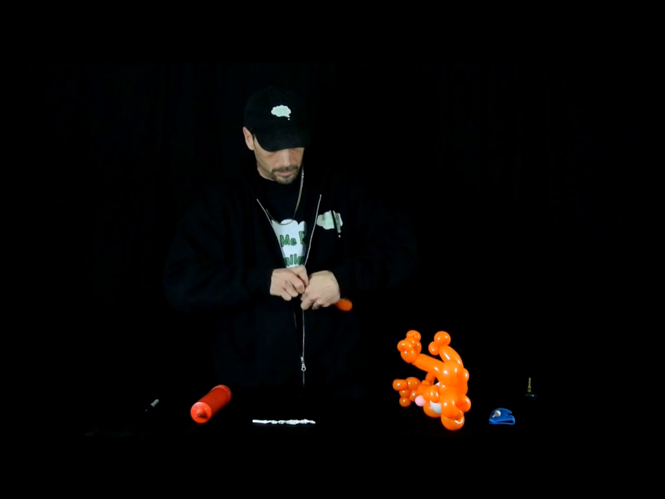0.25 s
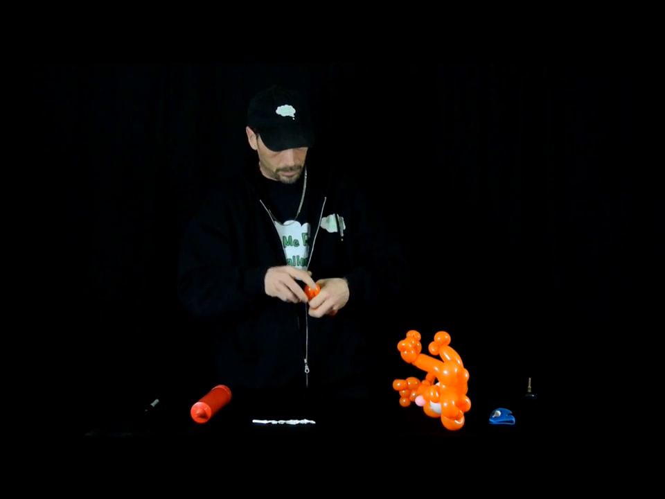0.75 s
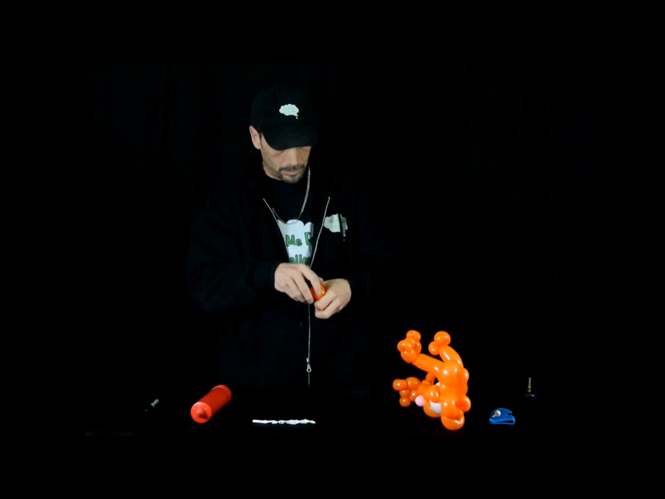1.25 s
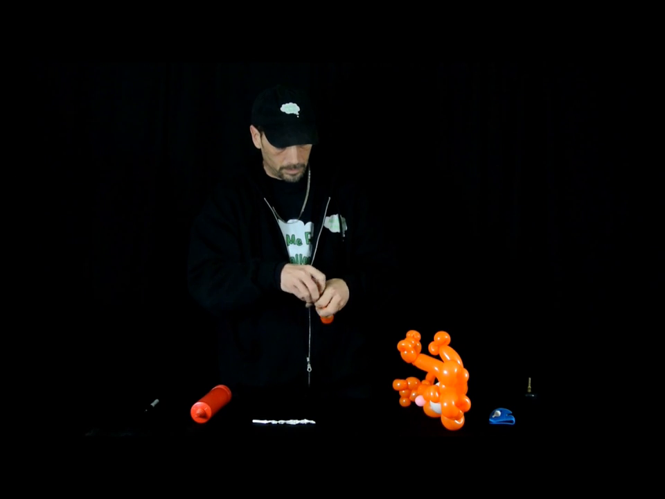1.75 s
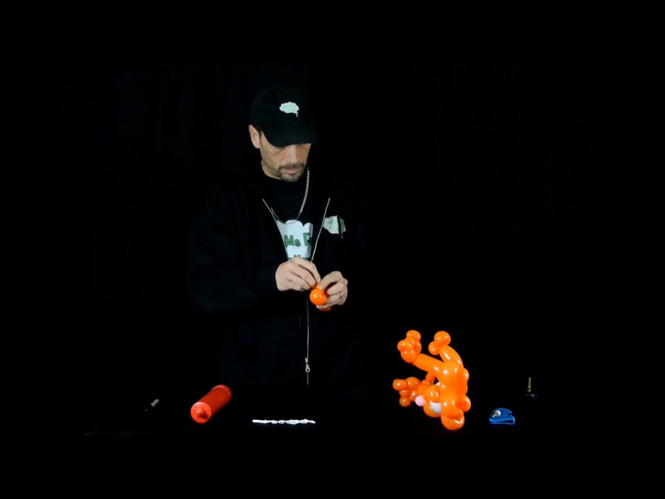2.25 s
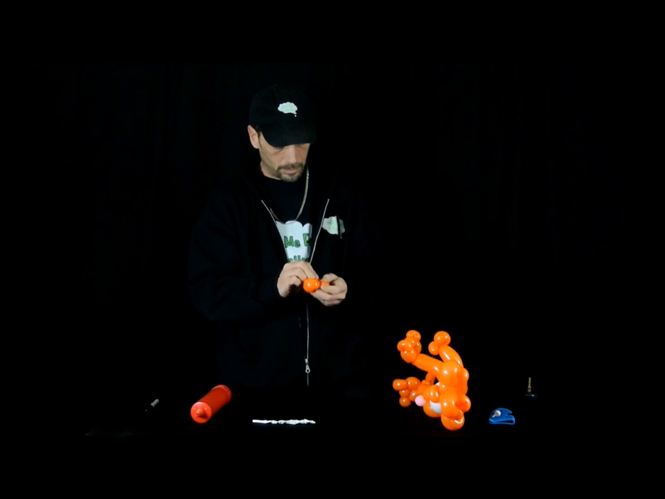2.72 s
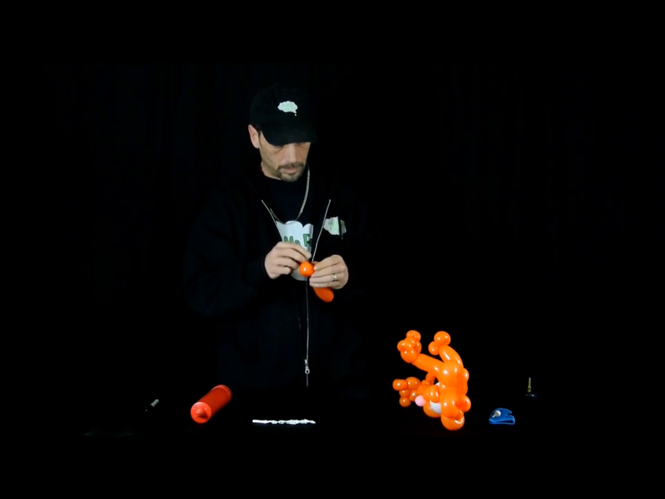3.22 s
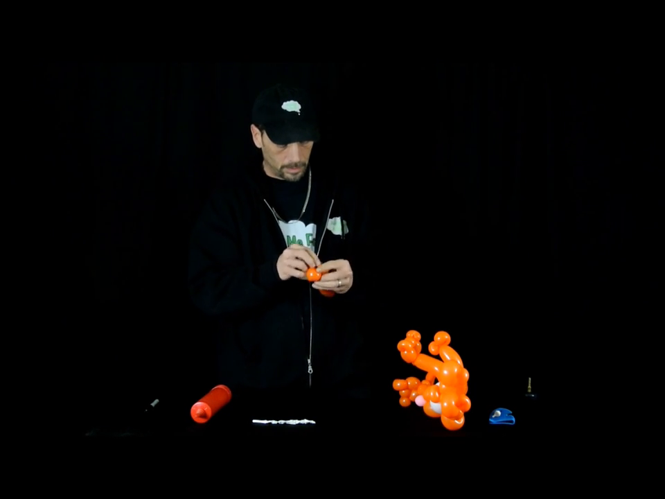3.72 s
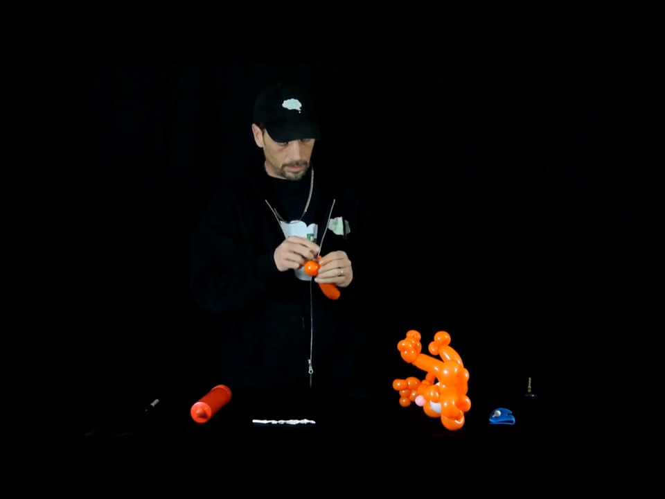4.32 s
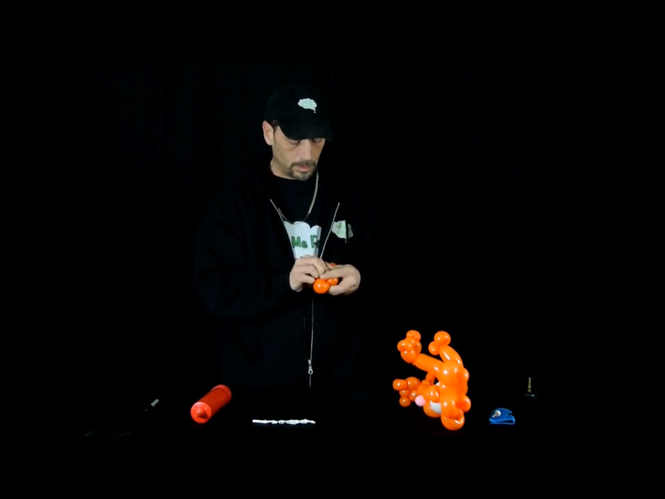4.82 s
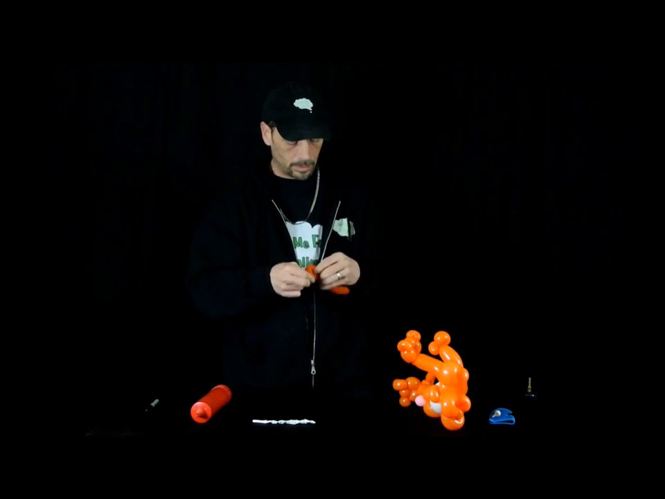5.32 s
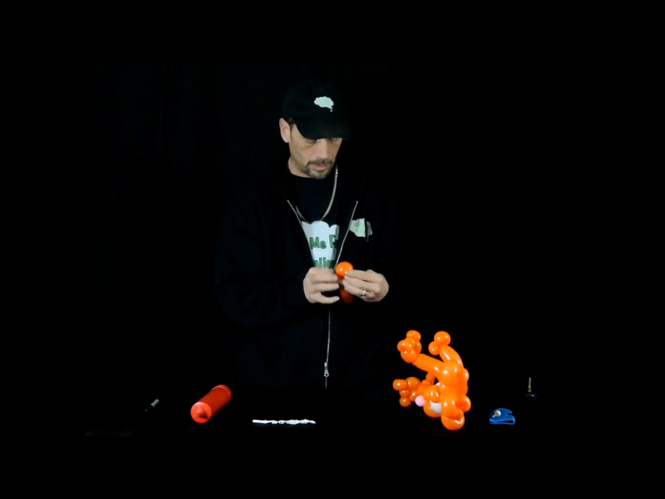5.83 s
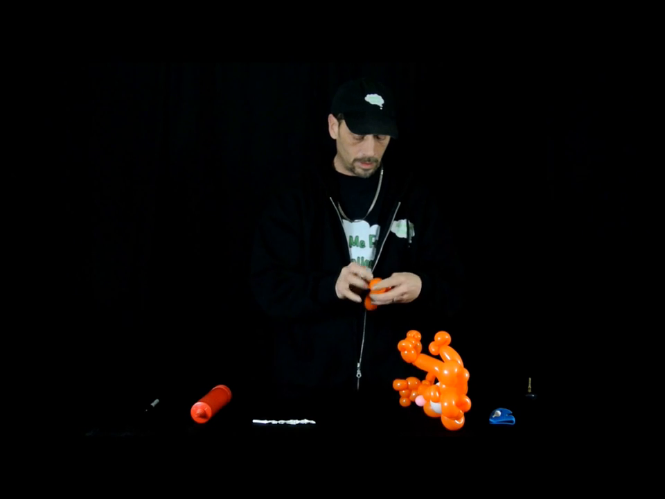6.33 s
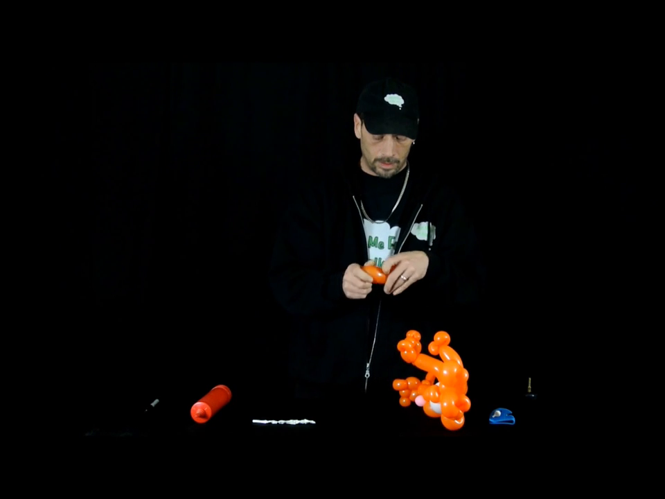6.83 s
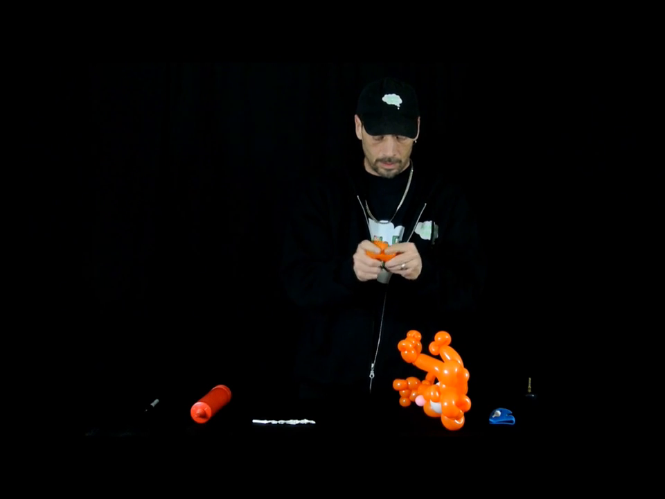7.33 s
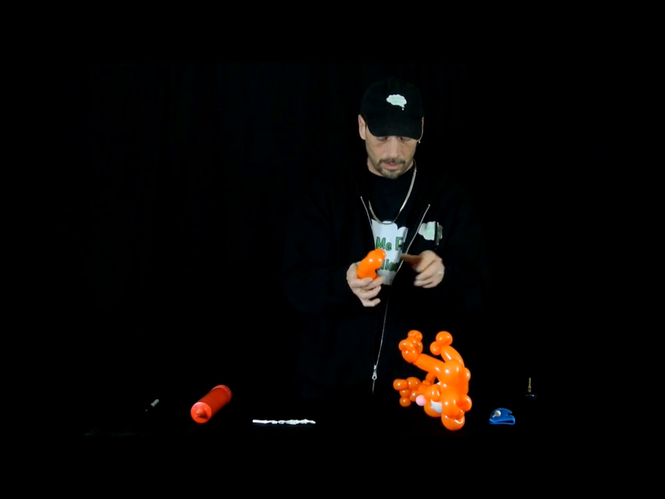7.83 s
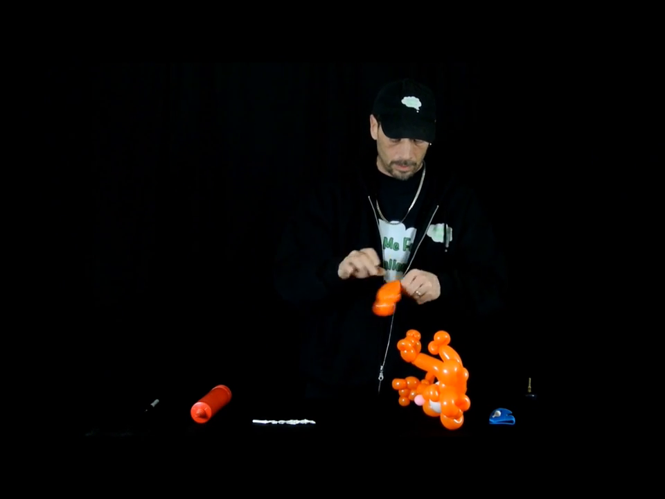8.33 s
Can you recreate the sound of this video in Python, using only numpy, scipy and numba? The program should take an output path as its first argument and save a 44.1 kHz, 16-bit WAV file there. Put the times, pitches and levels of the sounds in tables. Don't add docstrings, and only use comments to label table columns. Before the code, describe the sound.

Fingers rub and twist stretched rubber, squeaking and crackling in irregular bursts that grow denser and louder, with a short indoor echo.

```python
import sys
import numpy as np
from scipy import signal
from scipy.fft import rfft, irfft
from scipy.io import wavfile
from scipy.ndimage import uniform_filter1d
from numba import njit

SR = 44100
rng = np.random.default_rng(int(sys.argv[2]) if len(sys.argv) > 2 else 0)


def dump(signal):
    limited = np.clip(np.atleast_2d(signal).T, -1, 1)
    pcm = np.round(limited * 32767).astype(np.int16)
    wavfile.write(sys.argv[1], SR, pcm)


def gain_from_db(level_db):
    decades = np.asarray(level_db, float) / 20
    return 10 ** decades


N = 377496


def unit(x):
    return x / np.sqrt(np.mean(x ** 2))


def colour(x, points):
    hz, db = np.transpose(points)
    log_hz = np.log(np.fft.rfftfreq(x.shape[-1], 1 / SR) + 1)
    gain = gain_from_db(np.interp(log_hz, np.log(hz), db))
    return irfft(rfft(x) * gain, x.shape[-1])


@njit
def svf(x, hz, width):
    y, b, l = np.empty(len(x)), 0., 0.
    for i in range(len(x)):
        g, k = np.tan(np.pi * hz[i] / SR), width[i] / hz[i]
        v = (b + g * (x[i] - l)) / (1 + g * (g + k))
        b, l, y[i] = 2 * v - b, l + 2 * g * v, k * v
    return y


def walk(rate):
    hold = int(SR / rate)
    held = np.repeat(rng.standard_normal(N // hold + 1), hold)
    return 0.87 * uniform_filter1d(held, hold)[:N]


def progress(length):
    return np.arange(int(length * SR)) / (length * SR)


def add(out, start, x):
    i = int(start * SR)
    out[i:i + len(x)] += x[:N - i]


# (frequency [Hz], level [dB])
HUM_TONES = [(59.2, -64.5), (117.5, -71.5), (174, -78)]
# (frequency [Hz], level per Hz [dB])
HISS_TONE = [(25, -7.5), (60, -2), (150, -5.5), (400, -3), (900, -9), (2000, -15), (5000, -21.5),
             (11000, -30.5), (16000, -30.5)]


def camera():
    t = np.arange(N) / SR
    hum = 0
    for hz, db in HUM_TONES:
        level = gain_from_db(db + 4 + 0.35 * walk(4.6))
        hum = hum + level * np.sin(2 * np.pi * hz * t + 0.33 * walk(3.7))
    mid, side = colour(rng.standard_normal((2, N)), HISS_TONE)
    side = colour(side, [(60, -4), (600, -4.0), (3000, 12), (15000, 15.5)])
    return hum + gain_from_db(-51) * unit(np.array([mid + side, mid - side]))


# (frequency [Hz], time to fade by 60 dB [s], level [dB])
WALL_ECHOES = [(200, 0.33, -14), (500, 0.33, -5.5), (1506, 0.22, -3.5), (3000, 0.2, -2), (7000, 0.16, -5.5),
               (14400, 0.046, -6.5)]


def room(x):
    t = np.arange(SR // 2) / SR
    tails = 0
    for hz, t60, db in WALL_ECHOES:
        band = signal.butter(2, [hz / 1.6, min(hz * 1.6, 20000)], "band", fs=SR, output="sos")
        fade = np.exp(-np.log(1000) * t / t60)
        decay = fade * np.clip((t - 0.004) / 0.003, 0, 1)
        noise = rng.standard_normal((4, 2, len(t)))
        tails = tails + gain_from_db(db) * signal.sosfilt(band, noise) * decay / np.sqrt(np.sum(decay ** 2))
    places = np.array([walk(14) for _ in tails])
    places /= np.sqrt(np.sum(places ** 2, axis=0))
    echoes = signal.fftconvolve((x * places)[:, None], tails, axes=2)
    return x + echoes.sum(axis=0)[:, :N]


# (time [s], length [s], start pitch [Hz], end pitch [Hz], level [dB])
END_FLAPS = [
    (2.906, 0.12, 325, 160, -46),
    (4.024, 0.11, 230, 156, -44),
    (6.203, 0.089, 500, 265, -47),
    (7.768, 0.08, 468, 200, -42.5),
]


def flaps():
    out = np.zeros(N)
    for start, length, hz0, hz1, db in END_FLAPS:
        u = progress(length)
        hz = hz1 + (hz0 - hz1) * (1 - u) ** 2
        wobble = svf(rng.standard_normal(8192)[:len(u)], hz, 0.73 * hz)
        wobble = svf(wobble, hz, 0.73 * hz)
        add(out, start, gain_from_db(db) * unit(wobble) * np.sin(np.pi * u ** 0.69))
    return out


# (time [s], length [s], slip rate [Hz], level [dB], lowest partial [dB])
STEADY_GRIPS = [(0.352, 0.16, 1253, -60, 5), (0.564, 0.048, 1242, -27.5, -7.5),
                (1.406, 0.048, 798, -47.5, 3), (2.899, 0.011, 586, -23, -2.5), (4.78, 0.022, 723, -42, 0.5),
                (5.234, 0.013, 424, -52.5, 11.5), (5.922, 0.032, 634, -26.5, -12),
                (6.019, 0.018, 1410, -27, -5), (6.181, 0.035, 1225, -39.5, 5),
                (6.58, 0.064, 438.4, -26, -23.5), (7.342, 0.035, 1285, -50.5, 9)]
# (time [s], length [s], start slip rate [Hz], end slip rate [Hz], level [dB])
SLIDING_GRIPS = [
    (1.824, 0.031, 713, 674, -48),
    (3.758, 0.006, 1400, 1270, -39),
    (3.989, 0.012, 1190, 2510, -30),
    (5.583, 0.061, 383, 400, -53),
    (5.875, 0.067, 362, 442, -53.5),
    (6.069, 0.045, 390, 302, -47.5),
    (6.225, 0.089, 729, 810, -50.5),
    (6.707, .13, 1000, 1254, -47.5),
    (7.603, 0.12, 1390, 1040, -41),
    (7.755, 0.032, 700, 500, -35),
]


def squeaks():
    out = np.zeros(N)
    steady = [(start, length, hz, hz, db, low_db) for start, length, hz, db, low_db in STEADY_GRIPS]
    sliding = [(*row, 6.5) for row in SLIDING_GRIPS]
    for start, length, hz0, hz1, db, low_db in steady + sliding:
        u = progress(length)
        waver, flutter = uniform_filter1d(rng.standard_normal((2, SR // 2)), size=100)[:, :len(u)]
        rough = np.minimum(0.12 + 3.0 * abs(hz1 / hz0 - 1), 0.6)
        hz = (hz0 + (hz1 - hz0) * u) * (1 + 1.01 * rough * waver)
        phase = 2 * np.pi * np.cumsum(hz) / SR
        tone = gain_from_db(low_db) * np.sin(phase)
        tone = tone + sum(np.sin(k * phase + k * k) / k ** 1.23 for k in range(2, 7))
        level = gain_from_db(db + (12 + 26 * rough) * flutter)
        add(out, start, level * tone * np.sin(np.pi * u ** 0.65))
    return out


def even(burst):
    bins = rfft(burst)
    return irfft(bins / uniform_filter1d(abs(bins), size=30))


# (time [s], crack peak [dB], bubble pitch [Hz], bubble above crack [dB])
RINGING_SNAPS = [(0.0922, -40.5, 3330, 0), (0.5836, -22.5, 1140, -15.5), (1.509, -42, 1640, -16),
                 (2.8963, -31, 1320, 2), (2.9017, -29, 1550, 8), (2.9098, -15, 3820, -9),
                 (3.2695, -24, 2520, -8), (3.3228, -17, 1150, -4), (3.9855, -32, 1280, 12),
                 (3.9903, -17, 2200, -12), (3.9943, -16.5, 2570, -2.5), (4.8766, -41.5, 1050, 10),
                 (5.2599, -29.5, 1920, 2), (5.5877, -23, 2310, -11), (5.5907, -25, 2580, -15),
                 (5.6251, -9, 2090, -4), (5.6255, -51, 250, -2), (5.9209, -26, 1280, -11),
                 (6.4448, -7.5, 2200, -11), (6.4452, -34, 860, 6.5), (6.457, -28, 3370, 3),
                 (7.0968, -14.5, 3670, -12), (7.1032, -19, 2200, -12.5), (7.6896, -28.5, 3030, 4.5),
                 (7.7523, -17, 1240, -11), (8.4467, -39, 2230, -16), (8.458, -36.5, 2200, -11),
                 (8.49, -40, 2200, -5), (4.583, -46, 2540, 0), (6.0125, -33, 4800, 0), (6.029, -28.5, 4500, 2)]
# (time [s], peak [dB])
DRY_TICKS = [(0.1955, -27.5), (0.51, -29), (0.516, -23.5), (0.5211, -24.5), (2.241, -51), (2.857, -27),
             (3.026, -29.5), (3.048, -32), (5.565, -40), (5.615, -27), (7.1184, -13), (7.133, -13.5),
             (7.247, -23), (7.3684, -30), (7.385, -23), (7.3912, -12), (7.395, -13.5), (7.429, -16.5),
             (7.518, -14.5), (7.5425, -20), (7.6808, -17.5), (8.1655, -36)]
# (time [s], peak [dB])
MORE_DRY_TICKS = [(0.2552, -42), (0.2894, -45), (0.334, -34), (1.0774, -40), (1.092, -40), (1.31, -40),
                  (1.737, -40), (2.4668, -35), (2.4997, -34), (2.799, -36), (5.2117, -31), (5.2174, -37),
                  (5.2234, -28), (5.5712, -38), (8.1324, -46), (8.1437, -42)]
# (frequency [Hz], level [dB])
FOLD_TONE = [(3000, 6), (6000, 0.5), (12000, -2)]


def snaps():
    out, t = np.zeros(N), np.arange(1024) / SR
    rows = [(*row, True) for row in RINGING_SNAPS]
    rows += [(start, db, 2380, -21, False) for start, db in DRY_TICKS + MORE_DRY_TICKS]
    for start, db, bubble_hz, ring_db, thick in rows:
        noise = rng.standard_normal(1024)
        crack = even(noise * np.minimum(t / 0.0028, 1) * np.exp(-t / 0.00093))
        crack = colour(crack, SKIN_TONE)
        if thick:
            crack = colour(crack, FOLD_TONE)
        hz = bubble_hz + 0 * t
        ring = noise * np.minimum(t / 0.00096, 1) * np.exp(-t / 0.0024)
        ring = svf(svf(ring, hz, 0.2 * hz), hz, 0.8 * hz)
        both = crack / abs(crack).max() + gain_from_db(ring_db + 1.5) * ring / abs(ring).max()
        add(out, start, gain_from_db(db + 5.0) * both)
    return out


def slips(spread_db, patchy_db, patch_rate):
    chance = np.minimum(rng.exponential(size=N), 4.5)
    size = gain_from_db(spread_db * chance + patchy_db * walk(patch_rate))
    return unit(rng.standard_normal(N) * size)


# (time [s], length [s], start pitch [Hz], end pitch [Hz], level [dB])
SLIDING_POCKETS = [(0.573, 0.064, 1230, 1240, -41), (2.234, 0.03, 1600, 1500, -54),
                   (2.307, 0.18, 3780, 2340, -43), (2.358, 0.12, 2300, 1310, -41.5),
                   (2.657, 0.077, 3100, 2600, -38), (4.465, 0.05, 1270, 1250, -51),
                   (4.52, 0.079, 1820, 2240, -44), (4.58, 0.044, 2500, 1970, -49),
                   (4.595, 0.19, 1290, 1000, -48.5), (4.72, 0.05, 1500, 900, -60),
                   (4.89, 0.081, 1050, 2400, -41), (5.624, 0.04, 4500, 4000, -37),
                   (5.867, 0.03, 9500, 9000, -38), (5.936, 0.04, 1330, 1280, -40),
                   (6.008, 0.043, 5570, 4500, -37), (6.023, 0.084, 1380, 1300, -48),
                   (6.06, 0.025, 11000, 10000, -39), (6.183, 0.15, 2100, 2200, -44.5),
                   (6.584, 0.08, 2340, 2300, -35), (6.629, 0.11, 754, 700, -44.5),
                   (6.683, 0.17, 1090, 1190, -45), (6.868, 0.076, 990, 1050, -46.5),
                   (7.385, 0.05, 11500, 11000, -31), (7.514, 0.011, 2430, 2000, -29.5),
                   (8.202, 0.068, 11000, 11000, -51), (8.255, 0.046, 9500, 8000, -48),
                   (8.48, 0.075, 2200, 1900, -55)]
# (time [s], length [s], start pitch [Hz], end pitch [Hz], level
# [dB])
MORE_POCKETS = [(0.087, 0.04, 3400, 3200, -52), (0.33, 0.2, 1270, 1250, -62),
                (0.637, 0.069, 2500, 2300, -46), (0.929, 0.16, 800, 720, -51.5),
                (1.242, 0.046, 650, 800, -57), (1.302, 0.026, 1300, 1300, -48),
                (1.37, 0.064, 800, 800, -53), (1.572, 0.097, 1400, 1300, -46.5),
                (1.801, 0.04, 1350, 1300, -48), (2.021, 0.025, 960, 950, -52),
                (3.007, 0.09, 1200, 1250, -47), (3.155, 0.065, 1380, 1260, -42),
                (3.258, 0.042, 1300, 1350, -41), (3.32, 0.088, 1000, 705, -45),
                (4.805, 0.036, 800, 800, -54), (5.2, 0.087, 1900, 1800, -43.5),
                (5.256, 0.09, 2400, 1500, -42), (5.627, 0.008, 250, 200, -46),
                (5.632, 0.098, 1450, 1300, -38), (5.635, 0.042, 850, 800, -48),
                (4.004, 0.038, 520, 500, -36.5), (2.899, 0.07, 595, 520, -41.5),
                (7.772, 0.07, 650, 400, -40.5), (6.24, 0.056, 780, 780, -47.5),
                (3.6, 0.061, 1300, 1300, -61), (6.446, 0.014, 4200, 4200, -35),
                (6.447, 0.019, 990, 950, -39.5)]


def pockets():
    out = np.zeros(N)
    push = slips(spread_db=5.0, patchy_db=3.0, patch_rate=120)
    for start, length, hz0, hz1, db in SLIDING_POCKETS + MORE_POCKETS:
        u = progress(length)
        grains = push[int(start * SR):][:len(u)]
        u = u[:len(grains)]
        hz = hz0 * (hz1 / hz0) ** u
        ring = svf(svf(grains, hz, 0.49 * hz), hz, 0.98 * hz)
        add(out, start, gain_from_db(db + 2) * unit(ring) * np.sin(np.pi * u ** 0.51))
    return out


STROKE_DEPTH_DB = 24


def layers(table, t):
    start, length, hiss_db, ring_db, creak_db = np.transpose(table)
    power = gain_from_db([hiss_db, hiss_db + ring_db, creak_db]) ** 2
    return t - start[:, None], length[:, None], power


# (time [s], fade [s], skin hiss [dB], bubble ring above hiss [dB], creak [dB])
SUDDEN_JERKS = [(0.0, 0.1, -40.5, -9, -65), (0.092, 0.087, -44.5, -4.5, -69), (0.194, 0.1, -42, -11, -75),
                (0.51, 0.13, -36, -5, -63), (1.154, 0.22, -39, -1, -72), (1.508, 0.083, -46.5, 3, -46),
                (2.24, 0.11, -58.5, 12.5, -71.5), (2.895, 0.13, -28.5, 5.5, -32),
                (3.02, 0.5, -49, -1.0, -58), (3.27, 0.25, -39.5, 2, -68), (3.322, 0.06, -33.5, 10.5, -35),
                (3.523, 0.19, -51.5, 4.5, -57), (3.67, 0.14, -54, 6, -58), (3.986, 0.12, -27.5, 3, -31.5),
                (5.258, 0.14, -42, 4, -47), (5.625, 0.079, -32, 9, -39.5), (5.92, 0.16, -34.5, 3, -41.5),
                (6.445, 0.12, -29.5, -6, -36), (6.592, 0.54, -47, 11.5, -45.5),
                (7.096, 0.22, -31.5, -1, -68), (7.246, 0.19, -34.5, -7, -58), (7.387, 0.28, -28, -7, -59),
                (7.517, 0.044, -26.5, -9, -64.5), (7.751, 0.07, -24, -0.5, -22.5)]


def jerks(t):
    late, fade, power = layers(SUDDEN_JERKS, t)
    lag_s, rise_db_per_s = 0.0022, 3500
    loss_db = np.maximum(STROKE_DEPTH_DB * late / fade, rise_db_per_s * (lag_s - late))
    return power @ gain_from_db(-loss_db) ** 2


# (time [s], length [s], skin hiss [dB], bubble ring above hiss [dB], creak [dB])
CATCHING_GRABS = [(0.897, 0.16, -38, -0.5, -52.5), (1.568, 0.11, -38.5, -1, -53),
                  (2.31, 0.26, -43.5, 1.5, -57), (3.14, 0.17, -35.5, -6, -55),
                  (0.325, 0.082, -44.5, -2.5, -65), (1.738, 0.049, -55.5, 0, -62),
                  (1.09, 0.038, -49, 1, -60), (3.758, 0.25, -48.5, 9.5, -53.5),
                  (4.582, 0.11, -48.5, 9, -74), (4.78, 0.11, -42.5, 2.5, -54),
                  (4.876, 0.13, -48.5, 10.5, -50.5), (5.565, 0.065, -36, -15, -61),
                  (6.015, 0.13, -35, 0.5, -52), (6.372, 0.073, -33.5, -2.5, -52),
                  (7.972, 0.12, -51, 0.5, -53.5), (8.447, 0.22, -45.5, -4, -55)]


def grabs(t):
    late, length, power = layers(CATCHING_GRABS, t)
    loss_db = np.maximum(STROKE_DEPTH_DB * (late / length) ** 3, -4000 * late)
    loss_db = loss_db + 3.5 * np.clip(1 - late / length / 0.42, 0, 1)
    return power @ gain_from_db(-loss_db) ** 2


# (middle time [s], length [s], skin hiss [dB], bubble ring above hiss [dB], creak [dB])
LONG_DRAGS = [(0.403, 0.63, -45.5, -5.5, -77), (0.608, 0.25, -40.5, 0.5, -51.5), (0.713, 0.29, -72, 8, -58),
              (1.26, 0.32, -63, 0, -61), (1.872, 0.25, -40, -3, -55), (2.077, 0.31, -51.5, 2.5, -59.5),
              (2.51, 0.24, -47.5, -5, -66.0), (2.694, 0.41, -44, -2, -60), (4.161, 0.39, -52.5, 6, -61.5),
              (4.56, 0.13, -63, 10, -75), (4.997, 0.38, -43, -8, -78), (5.099, 0.2, -41, -0.5, -59),
              (5.322, 0.37, -48, -12, -66), (5.45, 0.18, -40.5, -0.5, -54), (5.737, 0.22, -37, -3.5, -51),
              (5.912, 0.31, -36, -5, -51), (6.18, 0.29, -38, -1.5, -52.5), (6.243, 0.31, -35.5, -6, -47.5),
              (6.544, 0.41, -39, -3, -52), (6.736, 0.3, -35, -6.5, -46), (8.2, 0.19, -46, -7, -67)]
# (middle time [s], length [s], skin hiss [dB], bubble ring above hiss [dB], creak [dB])
SHORT_DABS = [(0.587, 0.035, -35, 3, -59), (0.856, 0.11, -51.5, 1.0, -60.0), (1.123, 0.15, -49, -2, -60),
              (1.317, 0.03, -54, 2, -56), (4.772, 0.1, -49.5, 0, -65), (5.172, 0.08, -56, 3, -61),
              (5.523, 0.04, -41, -9, -65), (3.19, 0.13, -40, 6.5, -56), (1.782, 0.21, -60.5, 10.5, -60),
              (2.697, 0.078, -52, 12.5, -75), (3.034, 0.088, -47.5, 6, -48), (3.56, 0.096, -52.5, -3, -60),
              (4.325, 0.16, -53, 3, -55), (4.468, 0.2, -58.5, 5, -56.5), (5.225, 0.14, -40.5, -6.5, -56),
              (6.89, 0.083, -37, -4, -59), (6.99, 0.17, -42.5, -4.0, -61), (7.129, 0.11, -33, -29, -83)]


def drags(t):
    late, length, power = layers(LONG_DRAGS + SHORT_DABS, t)
    loss_db = STROKE_DEPTH_DB * abs(2 * late / length) ** 2.63
    return power @ gain_from_db(-loss_db) ** 2


# (end time [s], build-up [s], skin hiss [dB], bubble ring above hiss [dB], creak [dB])
TIGHTENING = [
    (1.43, 0.26, -39.5, 0.5, -54),
    (2.878, 0.084, -34, -1.5, -56),
    (3.97, 0.17, -46, 0.5, -67.0),
    (4.715, 0.25, -41, 1.5, -48),
    (5.613, 0.084, -32, -3.5, -53),
    (7.08, 0.25, -44, -5, -62),
    (7.374, 0.04, -36.5, -1, -51),
    (7.694, 0.098, -27.5, 3.5, -71),
    (7.763, 0.21, -34, -4, -36),
    (8.3, 0.068, -37.5, -4, -47.5),
]


def twists(t):
    late, build_up, power = layers(TIGHTENING, t)
    loss_db = np.maximum(-STROKE_DEPTH_DB * late / build_up, 800 * late)
    return power @ gain_from_db(-loss_db) ** 2


# skin hiss, bubble ring, creak [dB]
RESTING_HANDS = (-58, -63, -75)


def strokes():
    t = np.arange(0, N + 64, 64) / SR
    power = gain_from_db(RESTING_HANDS)[:, None] ** 2 + jerks(t) + grabs(t) + drags(t) + twists(t)
    return [np.interp(np.arange(N) / SR, t, gain) for gain in np.sqrt(power)]


# (time [s], pitch of the loudest bubble [Hz], pitch of the slack rubber [Hz])
FINGER_PLACES = [(0.0, 3100, 540), (0.55, 2200, 880), (1.5, 1980, 760), (2.3, 3000, 666), (2.46, 2030, 650),
                 (2.7, 2930, 620), (2.88, 1300, 545), (3.35, 1410, 810), (4.56, 2200, 770),
                 (4.75, 1490, 850), (5.1, 2470, 557), (5.9, 2000, 620), (6.46, 2920, 694),
                 (6.79, 1550, 850), (7.03, 2760, 815), (7.51, 2500, 816), (7.68, 1250, 754),
                 (8.2, 2360, 645)]


def squeeze():
    times, *pitches = np.transpose(FINGER_PLACES)
    return [np.interp(np.arange(N) / SR, times, hz) for hz in pitches]


def creaking(gain, hz):
    push = slips(spread_db=-0.7, patchy_db=2.5, patch_rate=85)
    creak = svf(svf(push, hz, 1.12 * hz), hz, 1.12 * hz)
    return gain_from_db(1.5) * gain * unit(creak)


# (frequency [Hz], level per Hz [dB])
SKIN_TONE = [(1470, -35), (2500, -10), (3870, -3.5), (5660, -2.5), (12400, -2), (15600, -14), (16300, -35),
             (16700, -86)]
# (pitch [Hz], width [Hz], level [dB])
AIR_BUBBLES = [(880, 110, -10), (1354, 94, 7), (1750, 860, 4.5), (2200, 470, -3.5), (2580, 250, -5),
               (3250, 430, -6), (4590, 320, 0.5)]


def rubbing(hiss_gain, ring_gain, near_hz):
    hiss = colour(slips(spread_db=3.0, patchy_db=2.0, patch_rate=75), SKIN_TONE)
    push = slips(spread_db=2.0, patchy_db=2.0, patch_rate=70)
    gains = np.array([gain_from_db(db - 12 * np.log2(hz / near_hz) ** 2) for hz, width, db in AIR_BUBBLES])
    gains /= np.sqrt(sum(g ** 2 * width for g, (hz, width, db) in zip(gains, AIR_BUBBLES)))
    ring = 0
    for gain, (hz, width, db) in zip(gains, AIR_BUBBLES):
        flicker = gain_from_db(2.3 * walk(14))
        moving_hz = hz * (1 + 0.019 * walk(11.0))
        ring = ring + gain * flicker * svf(push, moving_hz, np.full(N, 1. * width))
    ring = colour(ring, [(400, -5.5), (900, 0.5), (4500, 4.0), (9000, -0.5)])
    return gain_from_db(-0.1) * hiss_gain * unit(hiss) + gain_from_db(0.8) * ring_gain * unit(ring)


# (frequency [Hz], left minus right [dB])
EAR_LEAN = [(700, 0.5), (2000, -1.5), (9000, 1)]


def scene():
    hiss, ring, creak = strokes()
    bubble_hz, slack_hz = squeeze()
    balloon = rubbing(hiss, ring, bubble_hz) + creaking(creak, slack_hz)
    balloon = balloon + snaps() + squeaks() + flaps() + pockets()
    left, right = room(balloon)
    left = colour(left, [(hz, db / 2) for hz, db in EAR_LEAN])
    right = colour(right, [(hz, -db / 2) for hz, db in EAR_LEAN])
    return np.array([left, right]) + camera()


def low_pass(x):
    return signal.sosfilt(signal.butter(12, 16810, fs=SR, output="sos"), x)


def record(dry):
    keep = np.exp(-1 / (0.3 * SR))
    power = signal.lfilter([1 - keep], [1, -keep], np.mean(dry ** 2, axis=0))
    levelled = dry * (1 + power / gain_from_db(-71.5)) ** -0.15
    rounded = np.tanh(1.232 * levelled) / 1.166
    heard = colour(rounded, [(13000, 0.5), (15500, 4.0), (16600, -22), (17500, -50)])
    return low_pass(heard)


dry = scene()
out = record(dry)
dump(out)
```